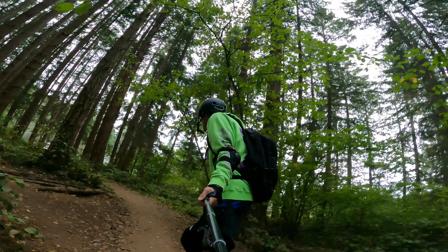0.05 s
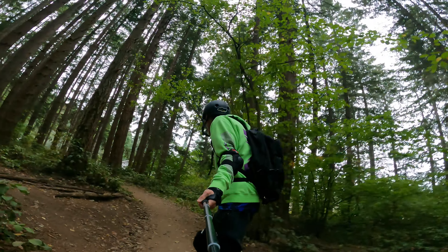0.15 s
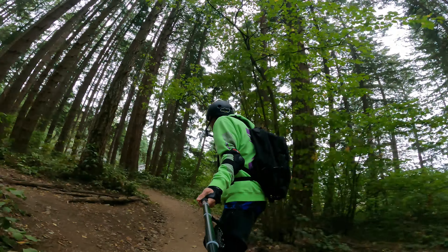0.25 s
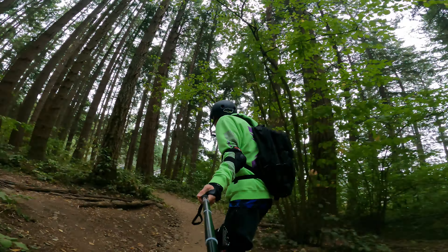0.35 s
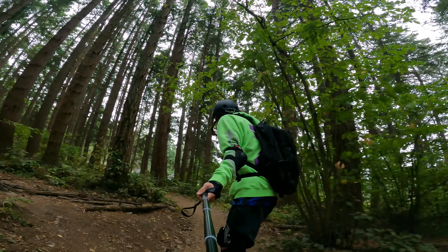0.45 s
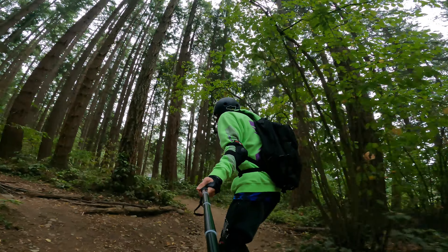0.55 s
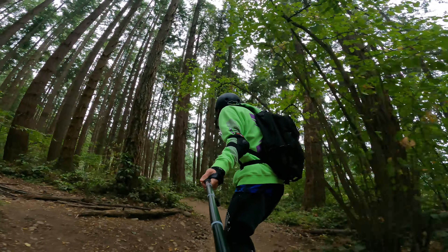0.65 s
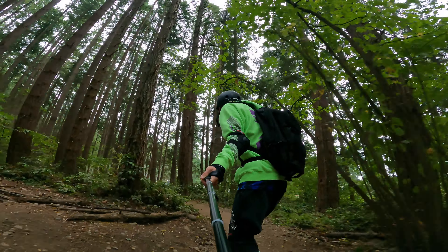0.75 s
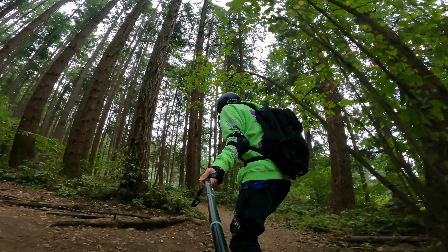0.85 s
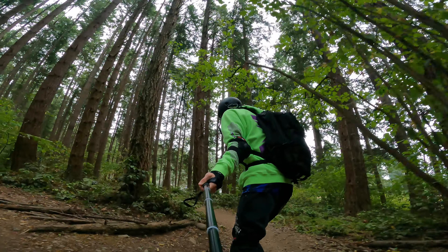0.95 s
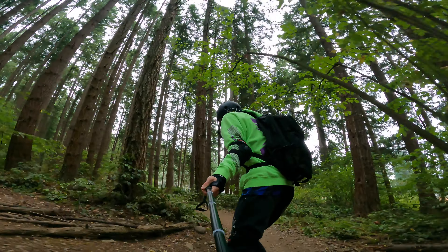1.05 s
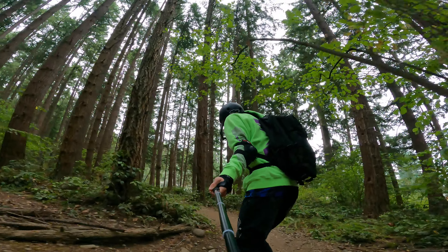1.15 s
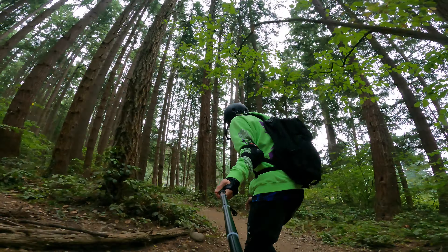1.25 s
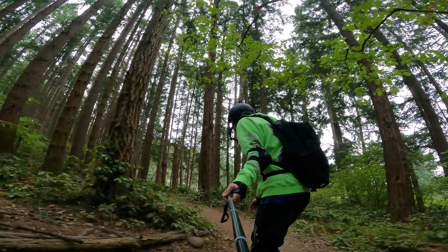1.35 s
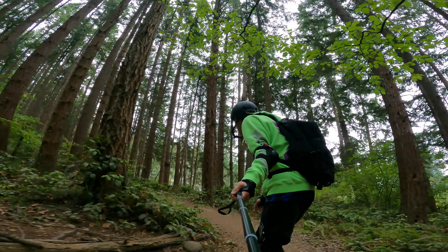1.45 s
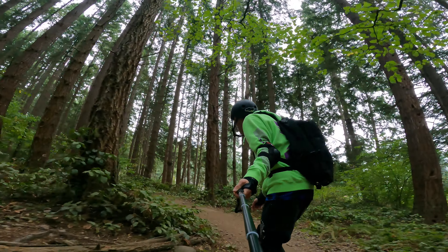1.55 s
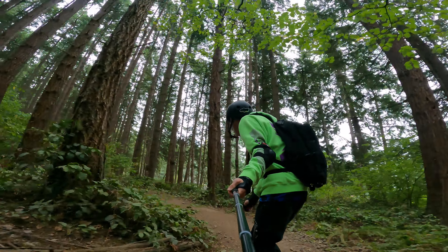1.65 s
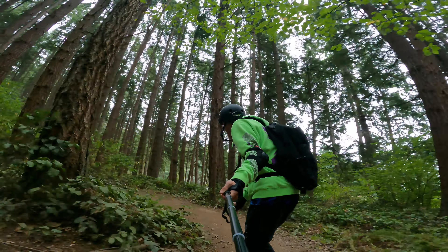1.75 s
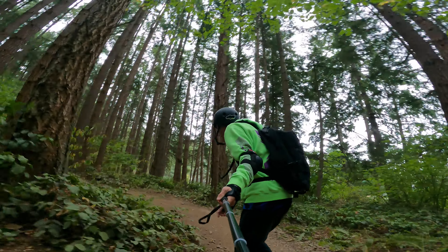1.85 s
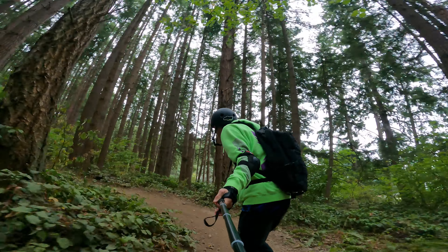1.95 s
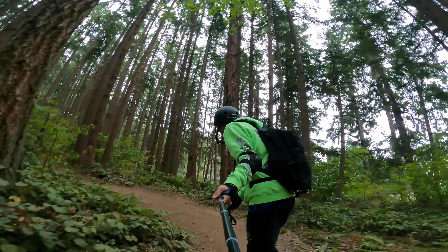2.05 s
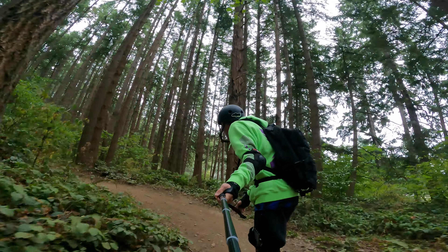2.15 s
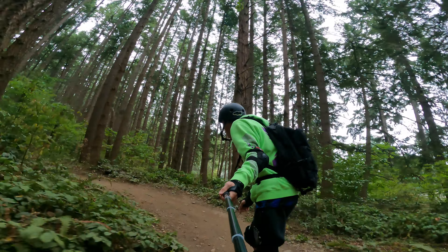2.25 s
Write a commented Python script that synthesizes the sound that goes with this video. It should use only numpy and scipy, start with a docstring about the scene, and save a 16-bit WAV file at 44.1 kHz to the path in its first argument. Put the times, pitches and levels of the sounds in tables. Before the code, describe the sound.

A single-wheeled electric board rumbles along a dirt forest trail, knocking over roots and snapping twigs while wind buffets the microphone and the motor whines.

```python
"""Forest dirt trail: an electric one-wheel board rolls past roots, grit and leaves, in gusty wind.
Ground noise is random grains through tyre resonances and spectra; knocks, snaps and cracks ring modes.
Motor and wheel are wavering tones; wind is shaped noise on the microphone, strongest in the first half.
The sound is almost mono until it widens near the end."""
import sys
import numpy as np
from scipy import signal
from scipy.fft import rfft, irfft, next_fast_len
from scipy.io import wavfile

SR = 44100
rng = np.random.default_rng(int(sys.argv[2]) if len(sys.argv) > 2 else 0)


def generate_wav(sig):
    """Save sig (samples, or channels by samples) to the path in sys.argv[1] as 16-bit PCM at SR."""
    pcm = np.round(np.clip(np.atleast_2d(sig).T, -1, 1) * 32767).astype(np.int16)
    wavfile.write(sys.argv[1], SR, pcm)


N = 329868


def from_db(db):
    """Decibels to amplitude gain."""
    return 10 ** (np.asarray(db) / 20)


def rms_one(x):
    """Scale to unit power."""
    return x / np.sqrt(np.mean(x ** 2) + 1e-20)


def in_time(rows):
    """Interpolate each column of a time curve at every sample."""
    t_s, *columns = np.transpose(rows)
    return [np.interp(np.arange(N) / SR, t_s, column) for column in columns]


def drift(rate_hz):
    """Slow random signal, unit power: noise through two equal poles, run at SR / 40."""
    step = 40
    r = np.exp(-2 * np.pi * rate_hz * step / SR)
    noise = rng.standard_normal(N // step + 2002)
    slow = signal.lfilter([1], [1, -2 * r, r * r], noise)[2000:]  # drop the settling
    return np.interp(np.arange(N) / step, np.arange(len(slow)), rms_one(slow))


def colour(x, spectrum):
    """Shape a steady sound by a spectrum, joined in log f; 12 dB/octave fall beyond its ends."""
    size = next_fast_len(N)
    hz = np.maximum(np.arange(size // 2 + 1) * SR / size, 1)
    points_hz, points_db = np.transpose(spectrum)
    ends = np.minimum(hz / points_hz[0], 1) ** 2 * np.minimum(points_hz[-1] / hz, 1) ** 2
    gain = from_db(np.interp(np.log(hz), np.log(points_hz), points_db))
    return irfft(rfft(x, size) * ends * gain, size)[:N]


def band(x, low_hz, high_hz, order=2):
    """Causal Butterworth band-pass."""
    edges_hz = [low_hz, min(high_hz, SR / 2 - 1)]
    sos = signal.butter(order, edges_hz, "band", fs=SR, output="sos")
    return signal.sosfilt(sos, x + 1e-18)


def resonate(x, modes):
    """Parallel two-pole resonances of alternating sign."""
    out = 0
    for k, (hz, width_hz, db) in enumerate(modes):
        r = np.exp(-np.pi * width_hz / SR)
        poles = [1, -2 * r * np.cos(2 * np.pi * hz / SR), r * r]
        gain = (-1) ** k * from_db(db) * (1 - r * r) / 2
        out = out + gain * signal.lfilter([1, 0, -1], poles, x)
    return out


def grains(per_s, spread_db, smooth_db):
    """Random contacts, many small and few large, over a noise bed of countless tiny ones."""
    sizes_db = spread_db * np.minimum(rng.exponential(1, N), 3.3)
    sizes = from_db(sizes_db) * rng.choice([-1, 1], N)
    born = rng.random(N) < per_s / SR
    return rms_one(rms_one(sizes * born) + from_db(smooth_db) * rng.standard_normal(N))


def crackle(spectrum, count, per_s, spread_db, smooth_db, flicker_db):
    """Narrow bands of grains on a log-f grid, each flickering by itself."""
    points_hz, points_db = np.transpose(spectrum)
    out = 0
    for hz in np.geomspace(points_hz[0], points_hz[-1], count):
        level_db = np.interp(np.log(hz), np.log(points_hz), points_db)
        gain = from_db(level_db + flicker_db * drift(48))
        out = out + gain * band(grains(per_s, spread_db, smooth_db), hz / 1.142, hz * 1.063)
    return rms_one(out)


def click_train(times_s, levels_db):
    """One-sample clicks at the given times."""
    clicks = np.zeros(N)
    clicks[np.round(times_s * SR).astype(int)] = from_db(levels_db)
    return clicks


def strike(times_s, levels_db, low_hz, high_hz, modes, chatter_db, chatter_s):
    """Each blow is a short push that rings the modes, with a dying chatter of loose parts."""
    def body(push):
        ring = sum(resonate(push, [mode]) for mode in modes)  # all of the same sign
        return band(push + ring, low_hz, high_hz)
    clicks = click_train(times_s, levels_db)
    r = np.exp(-2 / (chatter_s * SR))
    power = signal.lfilter([(1 - r) ** 2], [1, -2 * r, r * r], clicks ** 2 + 1e-24)
    chatter = from_db(chatter_db) * np.sqrt(np.abs(power)) * rng.standard_normal(N)
    return body(clicks + chatter) / np.abs(body(signal.unit_impulse(SR // 20))).max()


REBOUND_S, REBOUND_LOSS_DB = 0.0068, 4  # mean gap; loss per repeat


def rebounds(rows, count=5):
    """Each blow repeats unevenly for its length, losing strength: rows (t/s, level/dB ..)."""
    out = []
    unevenness = rng.uniform(-.25, .25, (len(rows), count))  # share of the gap
    for (t_s, *levels_db, length_s), uneven in zip(rows, unevenness):
        for k in range(count):
            if k * REBOUND_S <= length_s:
                again_s = t_s + REBOUND_S * (k + uneven[k] * (k > 0))
                out.append([again_s, *(np.array(levels_db) - REBOUND_LOSS_DB * k)])
    return np.array(out)


def grazes(rows, ahead_s, softer_db):
    """A light first contact ahead of each blow: rows (t/s, level/dB ..)."""
    t_s, *levels_db, _ = np.transpose(rows)
    early_s = t_s - ahead_s * rng.uniform(.7, 1.3, len(t_s))
    return np.column_stack([early_s, np.transpose(levels_db) + softer_db])


DEBRIS_SPREAD_DB = 3.8


def debris(per_s, levels_db, count=200):
    """Small things met at random, louder where the ground is: rows (t/s, level/dB ..)."""
    at = (np.cumsum(rng.exponential(1, count)) / per_s * SR).astype(int)
    chance_db = DEBRIS_SPREAD_DB * rng.standard_normal((count, len(levels_db)))
    inside = at < N
    at, chance_db = at[inside], chance_db[inside]
    ground_db = np.transpose([db[at] for db in levels_db])
    return np.column_stack([at / SR, ground_db + chance_db])


def forest(x, t60_s=0.3, echo_db=-10.0):
    """Trunks scatter a faint, bright tail: convolution with decaying noise."""
    t_s = np.arange(SR) / SR
    tail = rng.standard_normal(SR) * from_db(-60 * t_s / t60_s) * (1 - np.exp(-t_s / 0.0015))
    scattered = signal.fftconvolve(x, tail / np.linalg.norm(tail))[:N]
    return from_db(echo_db) * band(scattered, 1300, 8600, order=1)


GUST_ATTACK_S, GUST_RELEASE_S = 0.011, 0.041
GUST_ROUNDING = 0.19  # extra ramp, share of gust length


def gust_shape(start_s, length_s):
    """A gust rises, holds and dies away, more slowly if long."""
    end_s, round_s = start_s + length_s, GUST_ROUNDING * length_s
    rise_s = [start_s - GUST_ATTACK_S - round_s, start_s + round_s]
    fall_s = [end_s - round_s, end_s + GUST_RELEASE_S + round_s]
    return np.interp(np.arange(N) / SR, rise_s + fall_s, [0, 1, 1, 0])


# steady air flow over the microphone, before trim: t/s, buffeting level/dB
AIR_FLOW = [(0.0, -36.5), (0.21, -41.5), (0.4, -43.5), (0.58, -18.5), (1.04, -26.5), (1.26, -35),
            (2.07, -25), (2.3, -36), (2.72, -37), (3.67, -32.5), (4.01, -49.5), (4.79, -43), (5.31, -38),
            (6.72, -38), (7.45, -30)]
# gusts on top of the flow: start t/s, length/s, buffeting level/dB, eddies level/dB
WIND_GUSTS = [(0.083, 0.034, -32.5, -51), (0.2, 0.025, -26, -38), (0.286, 0.043, -26, -36),
              (0.341, 0.006, -16, -33), (0.424, 0.019, -16.5, -35), (0.504, 0.03, -16, -23),
              (0.58, 0.43, -22.5, -35), (0.8, 0.17, -20.5, -24), (1.045, 0.16, -20, -31.5),
              (1.4, 0.16, -22, -31), (1.6, 0.1, -23, -35), (1.796, 0.066, -20, -30.5),
              (1.98, 0.075, -20.5, -23), (2.1, 0.1, -22, -33.5), (2.35, 0.054, -23.5, -32.5),
              (2.854, 0.11, -21.5, -26), (3.025, 0.018, -22.5, -47), (3.288, 0.089, -23.5, -29),
              (3.503, 0.063, -27, -34), (3.676, 0.12, -27.5, -49), (3.85, 0.088, -30.5, -50),
              (4.05, 0.28, -38, -52), (4.457, 0.12, -34.5, -43), (5.183, 0.26, -33.5, -39),
              (6.915, 0.063, -31.5, -50), (7.243, 0.15, -25, -32.5)]
# buffeting spectrum: f/Hz, level/dB per Hz
BUFFET_SPECTRUM = [(18, 3.5), (30, 0.5), (45, 0), (70, -0.5), (100, -3.5), (150, -10), (230, -37.5),
                   (400, -27), (900, -38)]
EDDIES_DB, EDDIES_FOLLOW = -44.5, 0.46  # level at mean flow; share of the flow's dB swing


def wind(flow_trim_db=1.0, lump_db=0.0):
    """Pressure buffets the microphone; flow and gusts also shed smaller, higher eddies."""
    flow_db, = in_time(AIR_FLOW)
    push = from_db(flow_db + flow_trim_db)
    flutter = from_db(EDDIES_DB + EDDIES_FOLLOW * (flow_db - flow_db.mean()))
    for start_s, length_s, buffet_db, eddy_db in WIND_GUSTS:
        shape = gust_shape(start_s, length_s)
        push = np.maximum(push, from_db(buffet_db) * shape)
        flutter = np.maximum(flutter, from_db(eddy_db) * shape)
    buffet = rms_one(colour(rng.standard_normal(N), BUFFET_SPECTRUM))
    eddies = rms_one(band(grains(160, 1.1, -15.5), 89.6, 221.5))
    lumps = from_db(lump_db * drift(29))  # 0 dB: no extra lumps
    return buffet * push * lumps + eddies * flutter


# leaves swept aside: start t/s, length/s, level/dB
LEAF_BRUSHES = [(0.197, 0.047, -62), (0.53, 0.015, -64), (0.625, 0.01, -65), (0.696, 0.008, -64),
                (2.14, 0.012, -62), (2.163, 0.02, -56), (4.236, 0.035, -49), (5.292, 0.035, -63),
                (5.437, 0.03, -64), (5.522, 0.02, -61), (5.78, 0.043, -66), (6.305, 0.033, -70),
                (6.89, 0.015, -63), (7.16, 0.04, -67)]
# crinkle spectrum: f/Hz, level/dB per Hz
CRINKLE_SPECTRUM = [(5000, 0), (8000, 3.5), (10000, 0), (11200, -16), (13000, -9), (15000, -21)]


def brushes(attack_s=0.0067):
    """Leaves are swept aside, each a short, dry crinkle of grains that fades linearly."""
    t_s, level = np.arange(N) / SR, 0
    for start_s, length_s, db in LEAF_BRUSHES:
        corners_s = [start_s - attack_s, start_s, start_s + length_s]
        level = level + from_db(db) * np.interp(t_s, corners_s, [0, 1, 0])
    return level * rms_one(colour(grains(1300, 5.4, -5), CRINKLE_SPECTRUM))


# spinning wheel, before trims: t/s, hum level/dB
WHEEL_HUM = [(0, -63), (0.14, -30), (0.35, -41.5), (0.45, -36.5), (0.8, -42), (1.2, -38), (2.0, -36.5),
             (2.7, -37.5), (3.3, -38.5), (3.85, -37), (4.1, -39.5), (4.45, -44), (4.88, -38.5), (5.0, -45),
             (5.15, -34), (5.7, -52), (6.2, -35.5), (6.38, -51), (6.5, -36), (6.72, -45), (7.0, -43),
             (7.35, -32.5)]


def wheel_hum(hum_hz=498.6, tone_trim_db=-3.0, haze_trim_db=-3.0, wander=0.018, jitter=0.01394,
              flutter_db=1.5):
    """The spinning wheel hums: a wavering tone inside narrow noise that wavers with it."""
    hum_db, = in_time(WHEEL_HUM)
    pitch_hz = hum_hz * (1 + wander * drift(5.95) + jitter * drift(25.0))
    phase = 2 * np.pi * np.cumsum(pitch_hz) / SR
    tone = np.sin(phase) * from_db(flutter_db * drift(14))
    haze = drift(22) * np.sin(phase) + drift(22) * np.cos(phase)
    return from_db(hum_db) * (from_db(tone_trim_db) * tone + from_db(haze_trim_db) * haze)


# hub motor, before trim: t/s, whine level/dB
MOTOR_WHINE = [(0, -44.5), (1.2, -59), (2.3, -64), (3.2, -44), (3.7, -38), (3.87, -45), (4.1, -41),
               (4.65, -46), (4.85, -51), (5.15, -54), (5.45, -36), (5.72, -59), (6.0, -39), (6.22, -36),
               (6.45, -41), (6.6, -66), (7.0, -40), (7.48, -53)]


def motor(whine_hz=697.0, upper_hz=733.0, upper_db=-6.0, wander=0.00787, flutter_db=3.0, trim_db=-3.5):
    """The hub motor whines: two thin tones share pitch wander and flutter separately."""
    whine_db, = in_time(MOTOR_WHINE)
    warped_s = np.cumsum(1 + wander * drift(8.7)) / SR
    lower = np.sin(2 * np.pi * whine_hz * warped_s) * from_db(flutter_db * drift(31))
    upper = np.sin(2 * np.pi * upper_hz * warped_s) * from_db(upper_db + flutter_db * drift(10.0))
    return from_db(whine_db + trim_db) * (lower + upper)


# stones flung against the metal frame: t/s, deep ring level/dB, bright ring level/dB
FRAME_PINGS = [(4.1604, -13, -9.5), (4.2222, -19.5, -25), (4.2303, -13, -23), (4.4304, -50, -37),
               (5.76, -28, -40)]
# frame modes, the first one deep: f/Hz, width/Hz, level/dB
FRAME_RING = [(1020, 43, 0), (1934, 96, 5), (2390, 180, 1), (2820, 100, -4), (3400, 140, -2.5),
              (4640, 220, -14), (6100, 440, -15.5), (7360, 270, -20)]


def pings():
    """A flung stone rings the frame briefly; deep and bright modes have their own strengths."""
    t_s, deep_db, bright_db = np.transpose(FRAME_PINGS)
    out = 0
    for levels_db, modes in ((deep_db, FRAME_RING[:1]), (bright_db, FRAME_RING[1:])):
        peak = np.abs(resonate(signal.unit_impulse(SR // 20), modes)).max()
        out = out + resonate(click_train(t_s, levels_db) + 1e-18, modes) / peak
    return out


# stick breaking under the tyre: t/s, level/dB
STICK_BREAKS = [(6.0675, -17), (6.0739, -13), (6.0803, -18), (6.0842, -22), (6.094, -24)]
# stick modes: f/Hz, width/Hz, level/dB re direct push
STICK_RING = [(900, 150, 5), (1550, 200, 8), (2670, 300, -5), (4150, 520, -5.5)]


def stick():
    """A dry stick gives way in a quick run of clean, hard cracks."""
    t_s, db = np.transpose(STICK_BREAKS)
    cracks = strike(t_s, db, 700, 4040, STICK_RING, chatter_db=-7, chatter_s=0.002)
    return band(cracks, 450, 4100, order=8)


# twigs and pebbles: t/s, snap level/dB, crack level/dB before trim, edge level/dB, splintering/s
TWIG_SNAPS = [(0.186, -49, -43, -52, 0), (0.261, -55, -58, -42.5, 0), (0.4665, -30.5, -36, -47, 0),
              (0.9264, -32.5, -57, -68, 0), (1.0407, -28, -40, -64, 0), (1.0885, -33, -36, -50, .009),
              (1.1065, -24.5, -28.5, -40, .009), (1.1745, -31, -31.5, -48, 0), (1.19, -34, -40, -51, .009),
              (1.3103, -32, -46, -41, 0), (1.384, -29.5, -38, -54, 0), (1.4285, -40, -37, -57, 0),
              (1.4986, -28, -35.5, -47, 0), (1.5311, -39, -40, -56, 0), (1.5954, -25.5, -46, -47, 0),
              (1.6209, -34, -31.5, -50, .009), (1.6528, -28.5, -30.5, -39.5, 0), (1.7171, -29, -36, -63, 0),
              (1.9372, -26.5, -37, -44, 0), (1.957, -24, -43, -57, 0), (1.9815, -22, -44, -43, 0),
              (2.0334, -26, -30.5, -62, 0), (2.049, -26, -32, -60, .009), (2.1676, -26.5, -30, -53, 0),
              (2.2489, -24, -32, -55, 0), (2.3179, -46, -31, -61, 0), (2.3604, -28, -42, -51, 0),
              (2.4794, -26, -50, -60, 0), (2.537, -22.5, -36, -43, 0), (2.633, -35, -36, -54, 0),
              (2.6919, -25.5, -34, -48, 0), (2.8452, -18.5, -35, -41, 0), (2.92, -25.5, -40, -55, .014),
              (2.9554, -26, -48, -52, 0), (3.0307, -28.5, -49, -62, 0), (3.1559, -46, -36, -48, 0),
              (3.188, -49, -50, -42.5, 0), (3.2455, -31.5, -47, -43, 0), (3.3303, -27.5, -52, -45, 0),
              (3.4042, -28, -51, -43, 0), (4.1607, -26, -28, -28, 0), (4.1774, -24.5, -37, -35, .009),
              (4.2232, -28, -22, -35, 0), (4.2304, -24, -23, -33, 0), (4.2355, -18.5, -27, -46, 0),
              (4.2428, -19.5, -37, -30, .014), (4.3624, -39, -38, -48, 0), (4.4306, -42, -34, -39, 0),
              (4.499, -58, -48, -43.5, 0), (4.8525, -32.5, -42, -47, 0), (4.9182, -49, -42, -42.5, 0),
              (5.3665, -28, -52, -53, 0), (5.4386, -37, -33.5, -45, 0), (5.761, -23, -31, -43, 0),
              (5.938, -32, -42, -62, 0), (5.9445, -31, -35.5, -49, .009), (6.4654, -32.5, -40, -49, 0),
              (6.8425, -44, -53, -41.5, 0), (6.906, -26, -40, -36.5, 0), (6.938, -36, -54, -63, 0),
              (7.004, -31, -58, -48, 0), (7.145, -23, -34.5, -38, .009), (7.3249, -30, -49, -43, .014),
              (7.4436, -25, -45, -54, 0)]
# modes: f/Hz, width/Hz, level/dB re direct push
SNAP_RING = [(1520, 170, -11), (2010, 110, -13), (2460, 360, -9.5), (2700, 400, 0.5)]
CRACK_RING = [(3000, 360, 4), (3420, 280, 2.3), (4650, 540, 2.7)]
EDGE_RING = [(5600, 460, -0.5), (7300, 550, -12), (13200, 630, -13)]
TWIGS_PER_S = 18
TWIG_SNAP_DB, TWIG_CRACK_DB, TWIG_EDGE_DB = 3, -7, -21  # re grit in TRAIL_GROUND, before trim


def snaps(crack_trim_db=-1.0):
    """Twigs break and pebbles click in three bands, each with a short spray of crumbs."""
    _, _, grit_db = in_time(TRAIL_GROUND)
    twigs = debris(TWIGS_PER_S, [grit_db + TWIG_SNAP_DB, grit_db + TWIG_CRACK_DB, grit_db + TWIG_EDGE_DB])
    t_s, snap_db, crack_db, edge_db = np.vstack([rebounds(TWIG_SNAPS), twigs]).T
    snap = strike(t_s, snap_db, 1100, 1980, SNAP_RING, chatter_db=2.0, chatter_s=0.0037)
    crack = strike(t_s, crack_db + crack_trim_db, 2970, 4150, CRACK_RING, chatter_db=-4, chatter_s=0.0049)
    edge = strike(t_s, edge_db, 4000, 8040, EDGE_RING, chatter_db=-1.0, chatter_s=0.004)
    return band(snap + crack, 690, 5160, order=6) + edge


# roots and stones that knock the board: t/s, thud level/dB, clack level/dB, judder/s
BOARD_KNOCKS = [(0.573, -11, -8, .016), (0.587, -10.5, -30, 0), (0.8315, -18.5, -22.5, 0),
                (0.9051, -22, -12.5, 0), (1.0407, -32, -19, 0), (1.068, -19.5, -17, .009),
                (1.106, -14, -11.5, .016), (1.1753, -22, -18.5, 0), (1.2418, -29, -16, 0),
                (1.262, -31, -20.5, .009), (1.3103, -31, -17, .014), (1.384, -28, -30, 0),
                (1.4283, -25, -14, 0), (1.4635, -12, -15.5, 0), (1.4986, -23.5, -25, 0),
                (1.596, -33, -26, 0), (1.7039, -24, -17.5, 0), (1.8678, -25, -16, .014),
                (1.9372, -25, -27, 0), (1.9556, -30, -19, 0), (1.9815, -15.5, -22, 0),
                (2.2015, -17.5, -17.5, .009), (2.2925, -31, -18, 0), (2.3179, -24, -12.5, .009),
                (2.3573, -30, -10, 0), (2.537, -14, -7, 0), (2.584, -25, -19, .009),
                (2.6166, -31, -13, .009), (2.634, -19, -28, 0), (2.676, -19, -17, .014),
                (2.713, -31, -10.5, .009), (2.8015, -12, -19, 0), (2.8449, -17.5, -12.5, .009),
                (3.257, -9.5, -31, .009), (3.3295, -9, -16, 0), (3.3645, -10, -13.5, 0),
                (4.111, -29, -22, 0), (4.1615, -22, -11, 0), (4.164, -12.5, -22, 0), (4.1815, -23, -15, 0),
                (4.2185, -14, -21, .016), (4.2375, -7.5, -19, .009), (4.2455, -17, -18, 0),
                (4.254, -17, -14, 0), (4.2718, -15.5, -35, 0), (5.3229, -23, -22, .02),
                (5.903, -21.5, -38, 0), (5.919, -19, -23.5, .009), (5.939, -21, -25, 0),
                (6.0738, -21, -22.5, .009), (6.2085, -16.5, -26, .009), (6.3133, -20.5, -25.5, 0),
                (7.0998, -16.5, -23, 0), (7.144, -13, -13, .014), (7.246, -23, -14.5, 0),
                (7.3113, -30, -18.5, .014)]
# board modes: f/Hz, width/Hz, level/dB re direct push
THUD_RING = [(287, 130, 8), (453, 150, 10.5)]
CLACK_RING = [(635, 170, -2), (930, 160, 8), (1160, 210, -2.5), (1130, 170, -2)]
KNOCK_GRAZE_S, KNOCK_GRAZE_DB = 0.0078, -13  # mean lead; level re the blow
STONES_PER_S = 6
STONE_THUD_DB, STONE_CLACK_DB = 8, 5.5  # re rumble and crunch in TRAIL_GROUND


def knocks():
    """Roots and stones jolt the board: graze, then a low thud and a hollow clack."""
    rumble_db, crunch_db, _ = in_time(TRAIL_GROUND)
    stones = debris(STONES_PER_S, [rumble_db + STONE_THUD_DB, crunch_db + STONE_CLACK_DB])
    first_touches = grazes(BOARD_KNOCKS, KNOCK_GRAZE_S, KNOCK_GRAZE_DB)
    t_s, thud_db, clack_db = np.vstack([first_touches, rebounds(BOARD_KNOCKS), stones]).T
    thud = strike(t_s, thud_db, 160, 598, THUD_RING, chatter_db=-3.5, chatter_s=0.0057)
    clack = strike(t_s, clack_db, 523, 997, CLACK_RING, chatter_db=-6.0, chatter_s=0.0034)
    return band(thud + clack, 88, 2400, order=3)


# scuff spectrum: f/Hz, level/dB per Hz
SCUFF_SPECTRUM = [(700, 2.5), (1200, 4.5), (1550, -5), (2400, -5.5), (3500, -22.5)]
GRAVEL_PER_S, GRAVEL_SPREAD_DB = 380, 3.8
GRAVEL_DB = -12.5  # re crunch in TRAIL_GROUND


def gravel():
    """Pebbles scuff under the tyre: contacts too short to have a pitch, as coloured grains."""
    _, crunch_db, _ = in_time(TRAIL_GROUND)
    contacts = grains(GRAVEL_PER_S, GRAVEL_SPREAD_DB, -9)
    return from_db(crunch_db + GRAVEL_DB) * rms_one(colour(contacts, SCUFF_SPECTRUM))


# ground under the tyre, before trims: t/s, rumble level/dB, crunch level/dB, fine grit level/dB
TRAIL_GROUND = [(0.0, -45, -42, -54), (0.46, -40, -40, -48), (0.89, -45, -43.5, -54),
                (1.06, -34, -36, -45.5), (1.26, -36, -29.5, -41), (1.4, -35, -36.5, -45.5),
                (2.1, -38, -30, -48.5), (2.51, -36.5, -34.5, -48.5), (2.78, -33, -34, -45.5),
                (2.99, -39.5, -34, -48.5), (3.94, -43, -45.5, -55.5), (4.19, -40.5, -34.5, -66),
                (4.33, -43, -42.5, -54), (4.65, -44.5, -43.5, -55), (5.31, -39, -36.5, -49),
                (5.75, -41.5, -43.5, -53), (6.12, -39, -36, -47.5), (6.35, -37.5, -45.5, -55),
                (6.7, -41, -39.5, -50.5), (7.22, -33, -37, -55), (7.33, -39, -37.5, -46.5),
                (7.45, -37.5, -34, -65)]
# uneven packing of the dirt: t/s, clod spread/dB
CLOD_UNEVENNESS = [(0.3, 1.0), (1.0, 2), (3.0, 2.5), (3.7, 2.8), (6.8, 1.9), (7.3, 2.9)]
# dry litter brushed by the tyre, before trim: t/s, rustle level/dB
LEAF_LITTER = [(0.0, -75.5), (3.03, -73), (4.11, -77), (4.34, -70), (4.62, -78.5), (5.93, -71),
               (6.39, -76.5), (7.16, -74.5), (7.33, -66), (7.45, -64.5)]
# tyre and shell modes: f/Hz, width/Hz, level/dB
RUMBLE_RING = [(274.3, 82, -7), (407, 157, -2.5), (475.4, 128.5, -1)]
CRUNCH_RING = [(677, 150, 3.5), (948, 146, 2.5), (1000, 210, -13.5), (1290, 84, -14.5)]
# grit and litter spectra: f/Hz, level/dB per Hz
FINE_GRIT_SPECTRUM = [(1400, 9.5), (1700, 7), (2100, 5), (2800, 0.5), (4000, -6.5), (4900, -13),
                      (6200, -28)]
LITTER_SPECTRUM = [(3500, 1.5), (5500, -0.5), (7500, 2), (9500, -3.5), (11000, -22.5), (13000, -21),
                   (15000, -28.5)]


def tyre(rumble_trim_db=2.5, crunch_trim_db=-2.5, grit_trim_db=-2.0, leaf_trim_db=1.0, grit_clump=0.71):
    """Dirt grains drum on tyre and shell; each clod raises all layers together."""
    rumble_db, crunch_db, grit_db = in_time(TRAIL_GROUND)
    leaf_db, = in_time(LEAF_LITTER)
    spread_db, = in_time(CLOD_UNEVENNESS)
    clods_db = spread_db * drift(21)
    crumbs_db = clods_db + grit_clump * spread_db * drift(71)
    rumble = rms_one(band(resonate(grains(700, 1.3, -8.0), RUMBLE_RING), 167, 810))
    crunch_rings = sum(resonate(grains(220, 4.7, -4), [mode]) for mode in CRUNCH_RING)  # own grains per mode
    crunch = rms_one(band(crunch_rings, 536, 1320, order=3))
    grit = crackle(FINE_GRIT_SPECTRUM, count=8, per_s=500, spread_db=6.0, smooth_db=3.5, flicker_db=5.0)
    leaves = rms_one(colour(grains(1400, 6.8, 1.8), LITTER_SPECTRUM))
    out = rumble * from_db(rumble_db + rumble_trim_db + 0.44 * clods_db)
    out += crunch * from_db(crunch_db + crunch_trim_db + clods_db)
    out += grit * from_db(grit_db + grit_trim_db + crumbs_db)
    return out + leaves * from_db(leaf_db + leaf_trim_db + 0.9 * crumbs_db)


# side spectrum throughout: f/Hz, level/dB re scattered mid
BASE_WIDTH = [(500, -74), (2000, -65.5), (4000, -36), (8000, -20), (13000, -11)]
# opening from mono to stereo: t/s, level/dB (0 = fully open)
STEREO_OPENING = [(6.5, -80), (6.65, -23), (6.95, -16), (7.2, -10.5), (7.33, -4.5), (7.48, -8)]
# added side spectrum at full opening: f/Hz, level/dB re scattered mid
OPENED_WIDTH = [(400, -41), (1000, -20.5), (2000, -7.5), (4000, -0.5), (8000, -4), (13000, -7)]
WIND_SIDE_DB = -9.5  # separate side wind, at full opening


def scene():
    """All sources sit in the middle, slightly spread in the treble, until the stereo opens."""
    hits = knocks() + snaps() + pings()
    mid = wind() + tyre() + gravel() + motor() + wheel_hum() + brushes() + stick() + hits + forest(hits)
    scattered = mid * drift(400)
    opening_db, = in_time(STEREO_OPENING)
    base = colour(scattered, BASE_WIDTH)
    opened = colour(scattered, OPENED_WIDTH) + from_db(WIND_SIDE_DB) * wind()
    side = base + from_db(opening_db) * opened
    return np.array([mid + side, mid - side])


STOPBAND_HZ, STOPBAND_LOSS_DB = 16000, 70


def record(dry):
    """Peaks are rounded by tanh and the top is cut."""
    rounded = .9 * np.tanh(dry / .9)
    sos = signal.cheby2(12, STOPBAND_LOSS_DB, STOPBAND_HZ, fs=SR, output="sos")
    return signal.sosfilt(sos, rounded)


dry = scene()
out = record(dry)
generate_wav(out)
```